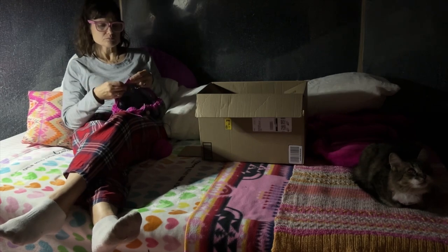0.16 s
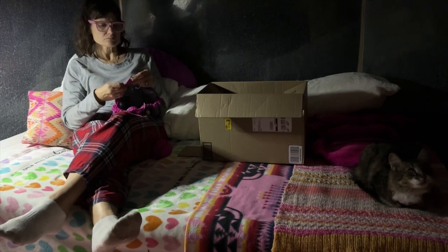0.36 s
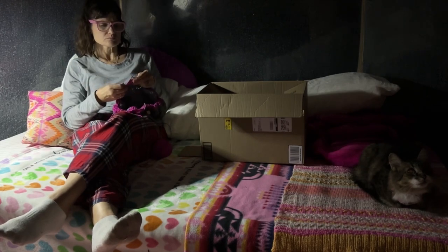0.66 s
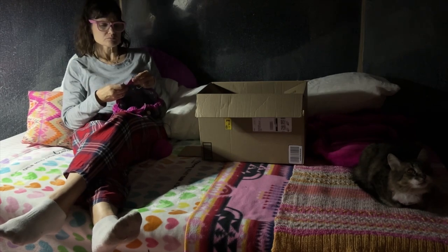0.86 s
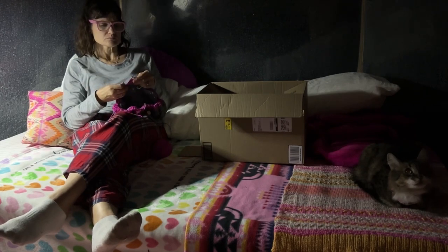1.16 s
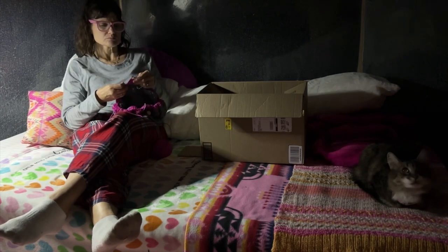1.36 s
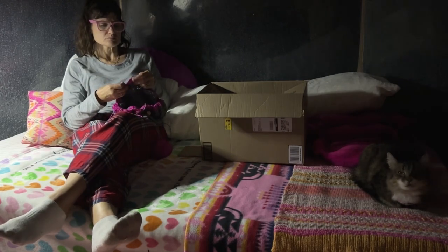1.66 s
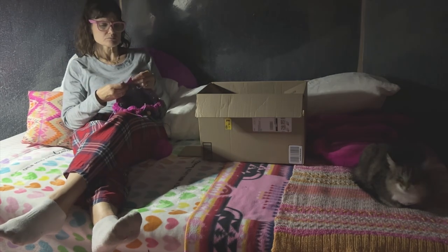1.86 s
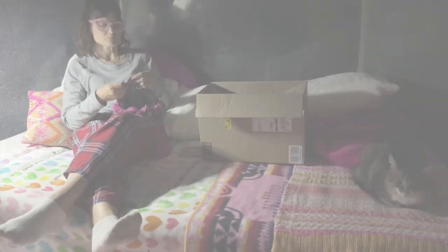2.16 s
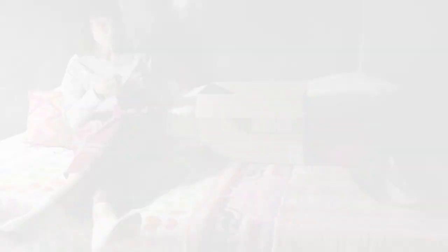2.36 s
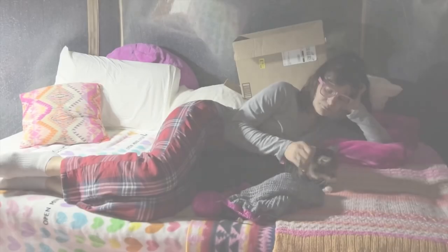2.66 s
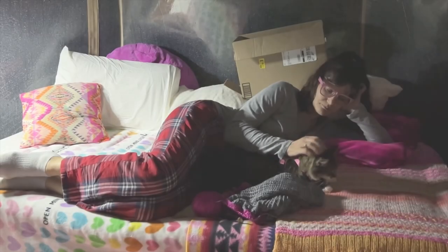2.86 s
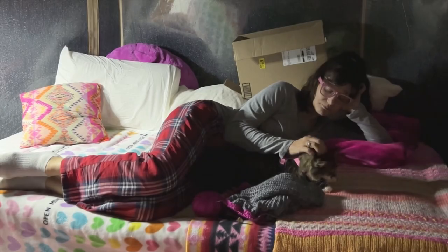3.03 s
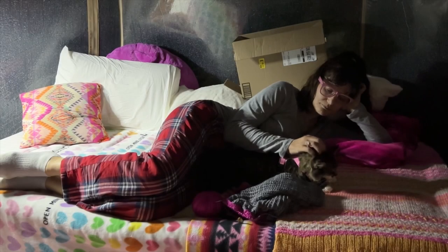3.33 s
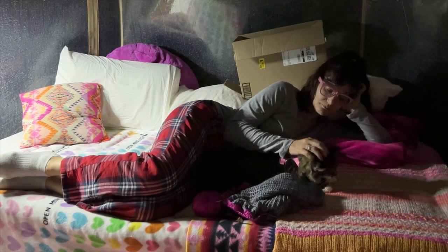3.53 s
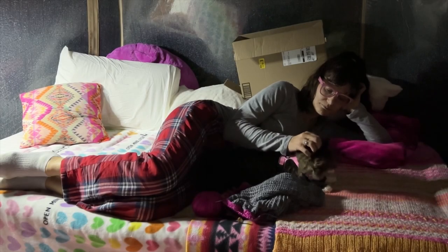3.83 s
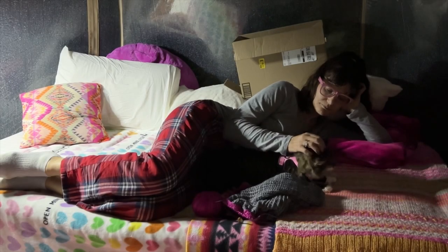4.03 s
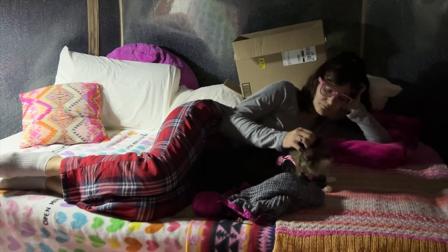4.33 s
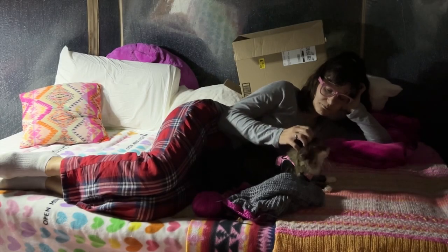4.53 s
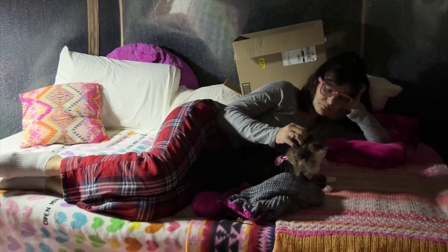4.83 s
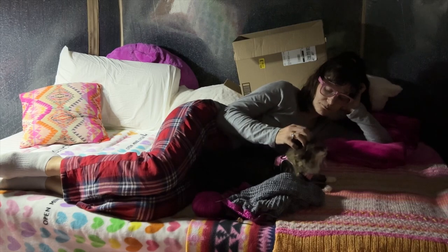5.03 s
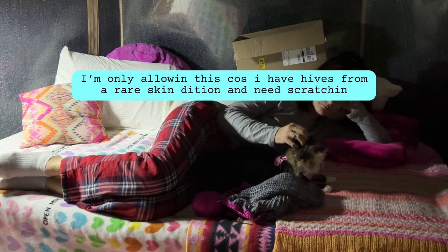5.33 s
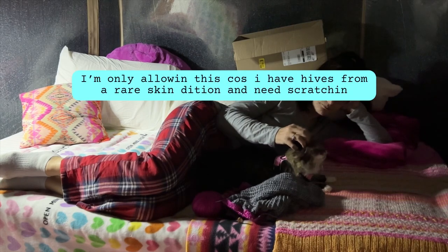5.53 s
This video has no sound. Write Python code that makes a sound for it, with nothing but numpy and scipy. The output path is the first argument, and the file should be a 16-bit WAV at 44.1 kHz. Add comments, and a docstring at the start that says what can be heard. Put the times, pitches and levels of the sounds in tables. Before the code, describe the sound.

Inside a tent, close stereo microphones catch irregular rain on taut canvas: dull falling taps with soft thumps and light spray over dense small patter, a distant wash and a low wavering hum. The hardest slaps come just before one second; then everything fades almost to silence and returns, continuing to the end.

```python
"""Rain on a tent, heard from inside by two microphones, left and right.
From the start big drops slap the canvas: a click filtered into tick, falling tap and spray, plus a brief
low sine thump; lesser such drops, filtered-noise wash and rumble, and a beating two-sine hum lie beneath.
The hardest slaps come near 0.9 s; from 1.5 s all fades out, almost silent at 2.4 s, and is back by 3.4 s.
Rain then goes on to the end at 5.7 s, with a hard pair of slaps near 4.7 s."""
import sys
import numpy as np
from scipy import signal
from scipy.fft import rfft, irfft, next_fast_len
from scipy.io import wavfile
from scipy.ndimage import uniform_filter1d

SR = 44100
rng = np.random.default_rng(int(sys.argv[2]) if len(sys.argv) > 2 else 0)


def digitize_waveform(pressure):
    """Quantize a signal to 16-bit integers and store it at the path in sys.argv[1].

    Rows of a 2-D input are taken as channels; values are limited to [-1, 1].
    """
    field = np.atleast_2d(pressure).T
    bounded = np.clip(field, -1, 1)
    quanta = np.round(bounded * 32767).astype(np.int16)
    wavfile.write(sys.argv[1], SR, quanta)


N = 250929
RING_SAMPLES = 8192


def gain_of(db):
    """Decibels to amplitude."""
    return 10 ** (np.asarray(db) / 20)


def evened(x):
    """Scales to rms 1."""
    return x / np.sqrt(np.mean(x ** 2) + 1e-20)


def read(points, hz):
    """Interpolates a spectrum table on a log-frequency axis."""
    f, value = np.transpose(points)
    return np.interp(np.log(hz + 1), np.log(f), value)


def curve(rows):
    """Columns of a time table at every sample."""
    s, *columns = np.transpose(rows)
    return [np.interp(np.arange(N) / SR, s, c) for c in columns]


def coloured(x, points, power=1):
    """Filters by a spectrum table, minimum phase, so that attacks stay sharp."""
    n = x.shape[-1]
    size = 2 * next_fast_len(n)
    hz = abs(np.fft.fftfreq(size, 1 / SR))
    log_gain = power * np.log(gain_of(read(points, hz)))
    response = np.exp(signal.hilbert(log_gain).conj())[:size // 2 + 1]
    return irfft(rfft(x, size) * response, size)[..., :n]


def add(mix, s, sound):
    """Mixes a sound in at time s."""
    start = max(round(s * SR), 0)
    part = mix[:, start:][:, :sound.shape[1]]
    part += sound[:, :part.shape[1]]


# Colours of the parts of a drop, before per-patch variation: f/Hz, relative level/dB
TAP_COLOUR = [(80, -9.5), (180, -7), (290, -1), (400, 5), (470, 1), (550, 3), (630, 0.5), (710, -0.5),
              (850, -4.5), (1200, -6), (1550, -4), (1950, -6.5), (2800, -15), (6000, -25.5)]
THUMP_COLOUR = [(50, -30.5), (110, -8), (170, -3), (240, 0), (330, 5), (700, -75)]
TICK_COLOUR = [(600, -20), (1400, -3), (2000, 0.5), (2900, -1.5), (4000, -7.5), (5500, -17), (8500, -25.5),
               (14000, -21.5)]
SPRAY_COLOUR = [(2000, -4.5), (4000, -1), (6000, -2), (7500, 1), (10000, -5.5), (12000, -11.5),
                (15000, -21)]


def drop(hz, thump_db, tick_db, spray_db, echo_db,
         lag_cycles=1.436, top_ratio=2.047, low_ratio=0.41, thump_s=0.0042):
    """One drop on taut canvas: tap, thump, tick and spray; part levels are relative to the tap."""
    t = np.arange(RING_SAMPLES // 4) / SR
    top_hz = hz * top_ratio

    # dent size limits the tap's band
    high_pass = signal.butter(2, hz * low_ratio, "high", fs=SR, output="sos")
    low_pass = signal.butter(8, top_hz, fs=SR, output="sos")
    click = 1. * (t == 0)
    dent = signal.sosfilt(low_pass, signal.sosfilt(high_pass, click))

    # low notes leave the cloth later than high ones: the tap falls in pitch
    share = np.minimum((np.fft.rfftfreq(len(t), 1 / SR) + 1) / top_hz, 1)
    dispersion = np.exp(-2j * np.pi * lag_cycles * (np.log(share) - share))
    dent = irfft(rfft(dent) * dispersion)
    tap_room = tent(early_db=echo_db + 3.5, early_s=0.015, late_db=echo_db - 8.5, late_s=0.04, lumpy=0.29)
    tap = heard(tap_room, TAP_COLOUR, dent)

    # the whole panel gives way a moment later
    sway_hz = 175 * rng.uniform(0.95, 0.96)
    sway = np.sin(2 * np.pi * sway_hz * t) * t * np.exp(-2 * t / thump_s)
    thump_room = tent(early_db=-4.5, early_s=0.0065, late_db=-12, late_s=0.045, lumpy=0.29)
    thump = heard(thump_room, THUMP_COLOUR, sway)

    # first contact
    tick_room = tent(early_db=echo_db + 9.5, early_s=0.0083, late_db=echo_db + 9.5, late_s=0.026, lumpy=0.57)
    tick = heard(tick_room, TICK_COLOUR)

    # splashed droplets landing again: a click smeared by dense echoes
    spray_room = tent(early_db=echo_db + 9.5, early_s=0.012, late_db=echo_db + 11, late_s=0.043, lumpy=0.38)
    spray = heard(spray_room, SPRAY_COLOUR)
    return tap + gain_of(thump_db) * thump + gain_of(tick_db) * tick + gain_of(spray_db) * spray


def heard(response, colour, pulse=(1.,), patch_db=1.62):
    """A pulse (default: a click) through tent and canvas, at rms 1 over its first 25 ms."""
    hz, db = np.transpose(colour)
    # every patch of canvas colours it a little differently
    patch_colour = np.transpose([hz, db + patch_db * rng.standard_normal(len(hz))])
    ringing = signal.fftconvolve([pulse], response, axes=1)[:, :RING_SAMPLES]
    sound = coloured(ringing, patch_colour)
    return sound / np.sqrt(np.mean(sound[:, :SR // 40] ** 2))


def tent(early_db, early_s, late_db, late_s, lumpy):
    """A click in the tent: direct sound, a cluster of echoes from the near walls, then a tail."""
    t = np.arange(RING_SAMPLES) / SR
    lumps = np.exp(lumpy * evened(uniform_filter1d(rng.standard_normal(RING_SAMPLES), 16)))
    early = (1 - np.exp(-(t / 0.0022) ** 2)) * np.exp(-t / early_s)
    late = (1 - np.exp(-t / 0.0086)) * np.exp(-t / late_s) * (1 - t / t[-1]) ** .5
    envelope = np.hypot(gain_of(early_db) * evened(early), gain_of(late_db) * evened(late))
    response = diffuse(RING_SAMPLES) * evened(lumps) * envelope / np.sqrt(RING_SAMPLES)
    response[:, 0] += 1  # direct sound
    return response


# Left-right correlation of the diffuse noise: f/Hz, correlation/1
LEFT_RIGHT_CORRELATION = [(60, 0.98), (150, 0.9), (280, 0.79), (400, 0.83), (580, -0.46), (900, -0.13),
                          (1400, 0.31), (3000, 0.29), (6000, 0.45), (8000, -1), (10000, 0.64),
                          (13000, 0.94), (15000, -0.11)]


def diffuse(n):
    """Stereo noise whose left-right correlation varies with frequency."""
    a, b = rfft(rng.standard_normal((2, n)))
    same = np.clip(read(LEFT_RIGHT_CORRELATION, np.fft.rfftfreq(n, 1 / SR)), -1, 1)
    return irfft(np.array([a, same * a + np.sqrt(1 - same ** 2) * b]), n)


def tick_level_db(spray_db):
    """A wetter hit sprays more and ticks harder."""
    return -2.5 + 0.52 * spray_db


# Big drops: t/s, tap level/dB, tap f/Hz, thump/dB re tap, spray/dB re tap,
# echo/dB (offset of tap, tick and spray echoes)
BIG_DROPS = [(.097, -45.5, 800, -10, -8.5, -4), (.117, -45, 880, -5, -23, -7),
             (.205, -47.5, 710, 0, -39, -1), (.369, -40.5, 870, -2, -17, -3),
             (.458, -48.5, 705, -8.5, -8, -6), (.504, -43, 880, -24, -9, -2), (.621, -40, 580, -2, -14, 0),
             (.86, -27.5, 765, -9.5, -16, -2), (.873, -28.5, 925, -4.5, -13.5, -2),
             (.979, -31, 604, -3.5, -20.5, -1), (1.07, -38, 990, -4, -10.5, -8),
             (1.183, -38, 644, -5, -19, -1), (1.217, -36.5, 690, -7.5, -40, -3),
             (1.407, -39.5, 740, -10.5, -36, -3.5), (1.547, -42, 850, -7, -11, 9),
             (1.681, -38.5, 850, -8, -20, -0.5), (1.774, -37.5, 794, -6, -18, -1.5),
             (1.941, -45, 750, 4, -10.5, 5), (2.095, -44, 764, -10, -1.5, 5),
             (2.148, -34, 760, -7.5, -12, 4), (2.256, -37.5, 710, -6, -6, -1.5),
             (2.493, -52, 1085, -11, -17, -6), (2.585, -44.5, 514, -17, -47, 2),
             (2.704, -35, 1100, -9, -13, .5), (2.821, -47.5, 910, -3.5, -5, 10),
             (2.899, -36.5, 986, -10.5, -7, -6), (2.958, -41, 830, -8.5, -19, -1.5),
             (3.035, -42, 1060, -6, -10.5, 5), (3.119, -44.5, 750, 1.5, -13.5, -3),
             (3.227, -43.5, 706, -13, -17, -1), (3.255, -39, 860, -8.5, -12.5, -3),
             (3.319, -41.5, 783, -10, -12.5, -4.5), (3.426, -33.5, 745, -16, -16, -3),
             (3.467, -39.5, 805, -15, -6.5, -5), (3.542, -36, 644, -9, -15.5, -4.5),
             (3.613, -49, 916, -1, -5.5, 1), (3.673, -44.5, 640, -15, -12, 1.5),
             (3.762, -39.5, 960, -7.5, -6, -2.5), (4.009, -32.5, 660, -17, -28.5, -5),
             (4.071, -49, 683, 3, -18, -2), (4.178, -45, 835, -20, -31, 11),
             (4.288, -31.5, 760, -3.5, -17, -5.5), (4.373, -42, 795, -2, -18, 2),
             (4.425, -43.5, 1000, -15, -14, -1), (4.682, -28.5, 870, -5.5, -13, -1.5),
             (4.695, -35.5, 770, -18, -13.5, 5), (4.907, -40.5, 903, -6, -6.5, -4),
             (4.931, -38, 810, 3, -37, -1), (5.01, -42.5, 807, -10, -13, 1),
             (5.224, -43, 1100, -14, -6, -8), (5.267, -38.5, 1000, -9.5, -12.5, -4.5),
             (5.298, -42, 930, -6, -19, 3), (5.317, -41.5, 910, -15, -8.5, -2),
             (5.398, -34.5, 650, -6.5, -16.5, -3), (5.484, -44, 720, -4, -27, -1.5),
             (5.54, -39, 830, -30, -18.5, .5), (5.64, -46.5, 1100, -25, -5, 4)]


def big_drops():
    """The drops that stand out, each striking the canvas at its own time."""
    out = np.zeros((2, N))
    for s, level_db, hz, thump_db, spray_db, echo_db in BIG_DROPS:
        sound = drop(hz, thump_db, tick_level_db(spray_db), spray_db, echo_db)
        add(out, s, gain_of(level_db) * sound)
    return out


def drips(level_db=-53, spread_db=5.0, pitch_hz=780, pitch_ratio=1.285,
          thump_db=-6, spray_db=-16, vary_db=6, echo_db=-2, count=44):
    """Middling drops at loose intervals, each with its own weight, pitch and wetness."""
    out = np.zeros((2, N))
    for k, (late, size, high, heavy, wet) in enumerate(rng.uniform(-1, 1, (count, 5))):
        wet_db = spray_db + vary_db * wet
        heavy_db = thump_db + vary_db * heavy
        sound = drop(pitch_hz * pitch_ratio ** high, heavy_db, tick_level_db(wet_db), wet_db, echo_db)
        at_s = (k + .5 + late / 2) / count * N / SR
        add(out, at_s, gain_of(level_db + spread_db * size) * sound)
    return out


def patter(level_db=-55.5, per_s=95, spread_db=6.5, echo_db=-3, count=40):
    """Small drops at random over the canvas, each patch with its own pitch, brightness and side."""
    out = np.zeros((2, N))
    strikes = rng.random(N) < per_s / SR
    size = gain_of(spread_db * np.minimum(rng.exponential(1, N), 3)) * strikes
    patch = rng.integers(0, count, N)
    for k, (high, bright, side) in enumerate(rng.uniform(-1.19, 1, (count, 3))):
        sound = drop(1080 * 1.476 ** high, thump_db=-3.0, tick_db=-14 + 1.8 * bright,
                     spray_db=-11 + 2.2 * bright, echo_db=echo_db)
        sound = sound * gain_of([[4.6 * side], [-2.5 * side]])
        for at in np.flatnonzero(size * (patch == k)):
            add(out, at / SR, size[at] * sound)
    return gain_of(level_db) * evened(out)


# Wash of distant drops: f/Hz, relative level/dB
WASH_COLOUR = [(100, -11.5), (170, -2), (280, 5.5), (500, -1.5), (900, 2.5), (1500, -6.5), (2500, -6.5),
               (3500, -9.5), (5000, -19), (7000, -18.5), (10000, -21.5), (15000, -31)]


def wash(level_db=-56.5):
    """Countless far drops merged into a hiss: filtered diffuse noise."""
    return gain_of(level_db) * evened(coloured(diffuse(N), WASH_COLOUR))


# Hum: t/s, level/dB
HUM_LEVEL = [(0, -53), (.5, -65), (1, -55.5), (2, -63), (2.9, -50), (3.7, -52.5), (4.2, -46.5), (4.75, -51),
             (5.1, -64), (5.6, -47)]
# Low rumble: f/Hz, relative level/dB
RUMBLE_COLOUR = [(20, -39), (32, -17), (45, -7.5), (56, -3), (68, -12.5), (80, -2.5), (100, -3),
                 (125, -14.5), (200, -32.5), (400, -57)]


def hum(hum_hz=67.3, beat_hz=7.7, waver=0.28, upper_db=-12, rumble_db=-55):
    """A low hum of steady pitch, like a distant motor, swelling and ebbing in a bed of rumble."""
    t = np.arange(N) / SR
    drift = evened(coloured(rng.standard_normal(N), [(1, 0), (4, 0), (16, -40), (100, -90)]))
    # a weaker tone just above beats against the main one
    upper = gain_of(upper_db) * np.sin(2 * np.pi * (hum_hz + beat_hz) * t)
    tone = np.sin(2 * np.pi * hum_hz * t) + upper
    swelling = gain_of(curve(HUM_LEVEL)[0]) * evened(tone * (1 + waver * drift))
    rumble = gain_of(rumble_db) * evened(coloured(diffuse(N), RUMBLE_COLOUR))
    return swelling + rumble


# Gain on drips, patter and wash: t/s, level/dB
SHOWER_GAIN = [(0, 9), (.7, 1.5), (1.15, 6.5), (1.5, 0), (3.3, -1), (4.2, 4), (4.6, -1), (4.85, 6.5),
               (5.69, 3.5)]
# Shape of the left-right balance, scaled per side in scene(): f/Hz, unscaled level/dB
BALANCE_SHAPE = [(100, 0), (700, .5), (1300, 2), (2400, 3.5), (4400, 4.5), (8000, 5), (15000, -6)]


def scene(left_lead_s=.000022):
    """All rain and hum; the nearest canvas is on the left, so sound arrives there first."""
    shower = gain_of(curve(SHOWER_GAIN)[0]) * (drips() + patter() + wash())
    left, right = big_drops() + shower + hum()
    lag = np.exp(-2j * np.pi * np.fft.rfftfreq(N, 1 / SR) * left_lead_s)
    left = coloured(left, BALANCE_SHAPE, 0.43)
    right = irfft(rfft(coloured(right, BALANCE_SHAPE, -0.32)) * lag, N)
    return np.array([left, right])


# Microphone colour: f/Hz, level/dB
MIC_COLOUR = [(20, -1), (7000, 0.5), (8100, -4), (9300, 3.5), (10500, 1), (11500, -2.5), (15000, 2.5),
              (15800, -18.5)]
QUIET_AT_S, FADE_OUT_S, FADE_IN_S = 2.425, 0.89, 0.96
OUT_BEND, IN_BEND, QUIET_GAIN = 0.93, 0.92, 0.0069  # bend 1 = straight ramp
EDGE_HZ = 16100


def record(dry):
    """Microphone colour, the fade out and back in, then the band limit."""
    t = np.arange(N) / SR - QUIET_AT_S
    fade_out = abs(t / FADE_OUT_S) ** OUT_BEND
    fade_in = abs(t / FADE_IN_S) ** IN_BEND
    fader = np.clip(np.where(t < 0, fade_out, fade_in), QUIET_GAIN, 1)
    faded = coloured(dry, MIC_COLOUR) * fader
    low_pass = signal.firwin(511, EDGE_HZ, window=("kaiser", 9), fs=SR)
    return signal.oaconvolve(faded, low_pass[None], "same")


dry = scene()
out = record(dry)
digitize_waveform(out)
```